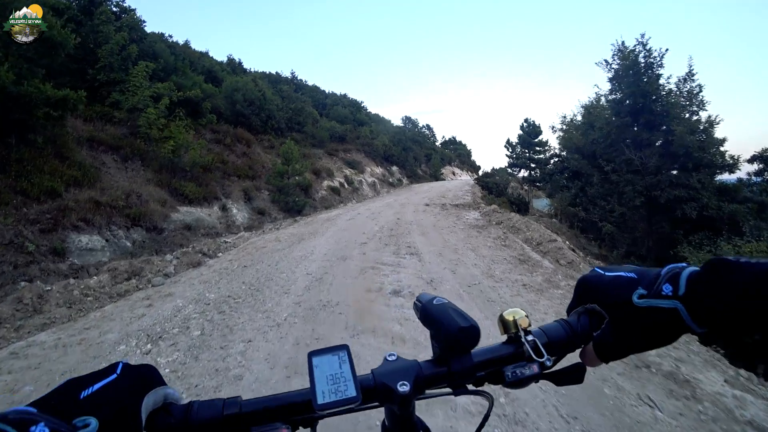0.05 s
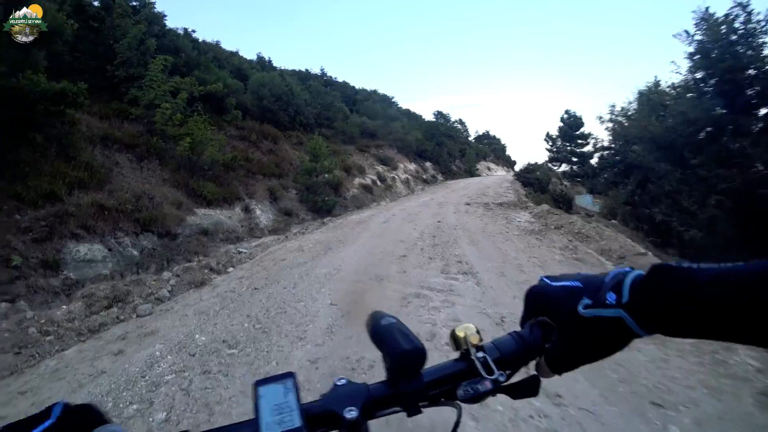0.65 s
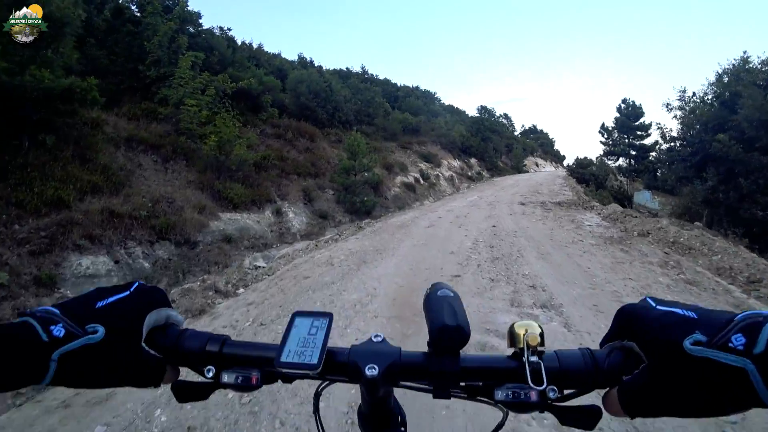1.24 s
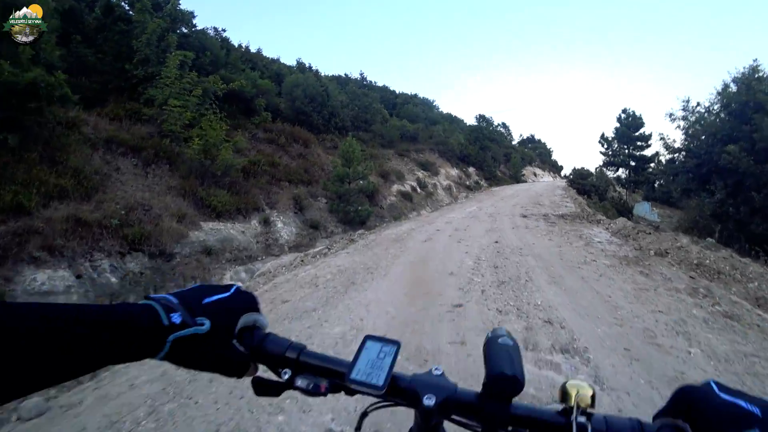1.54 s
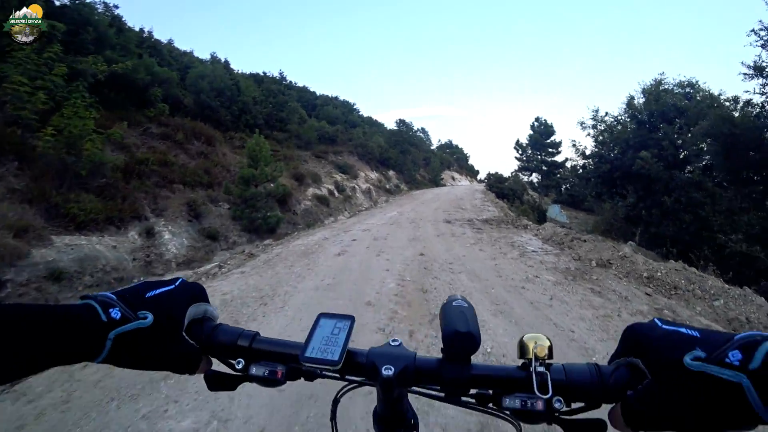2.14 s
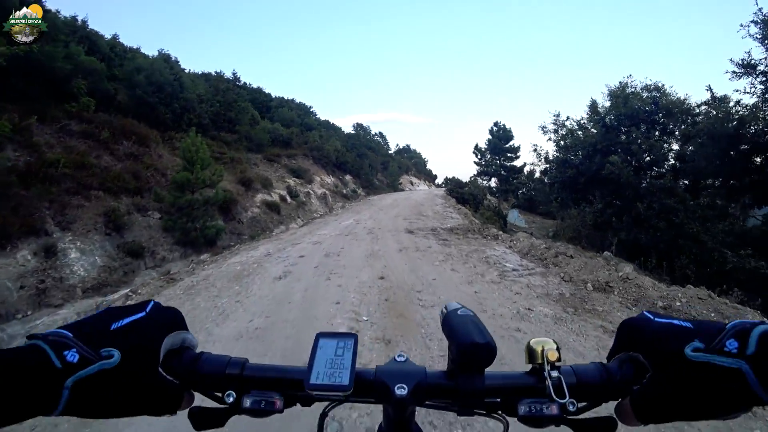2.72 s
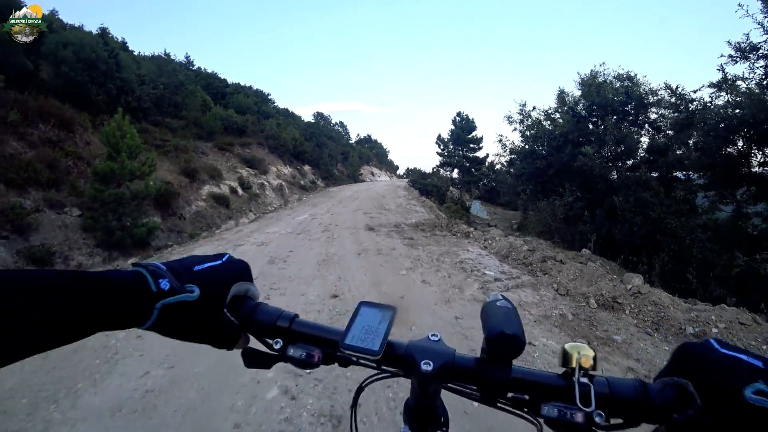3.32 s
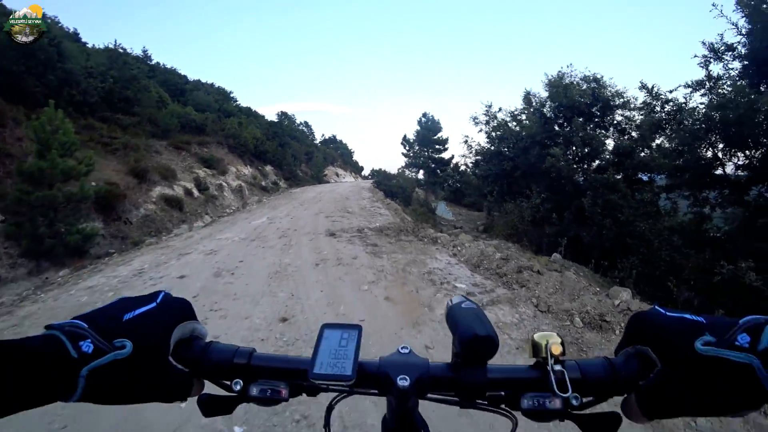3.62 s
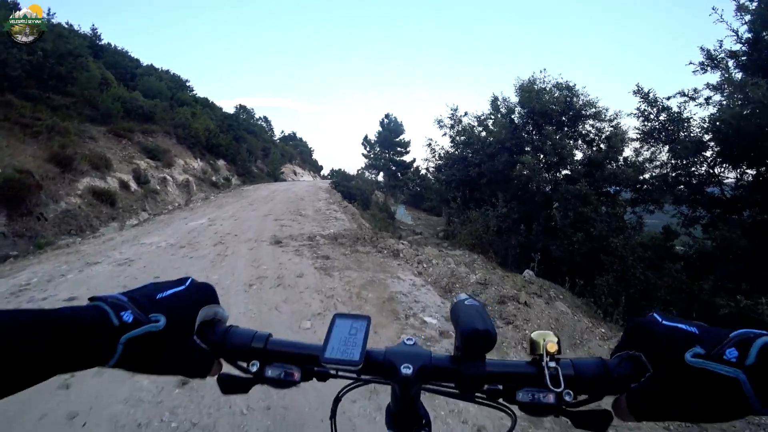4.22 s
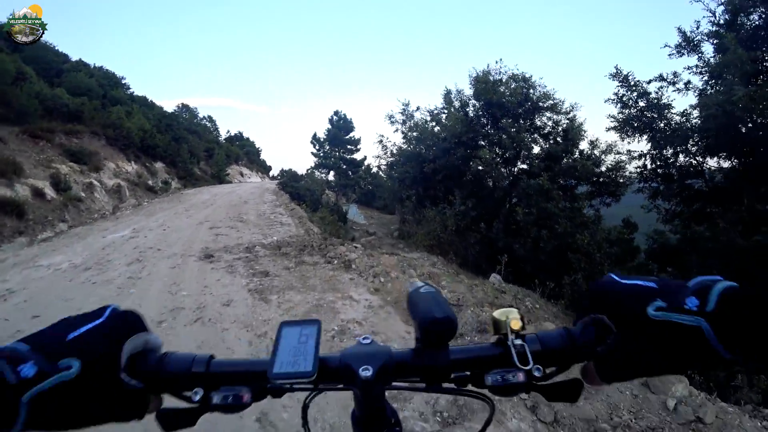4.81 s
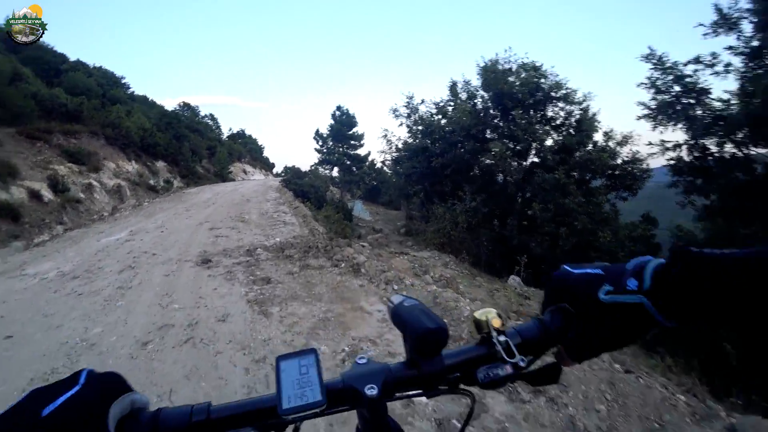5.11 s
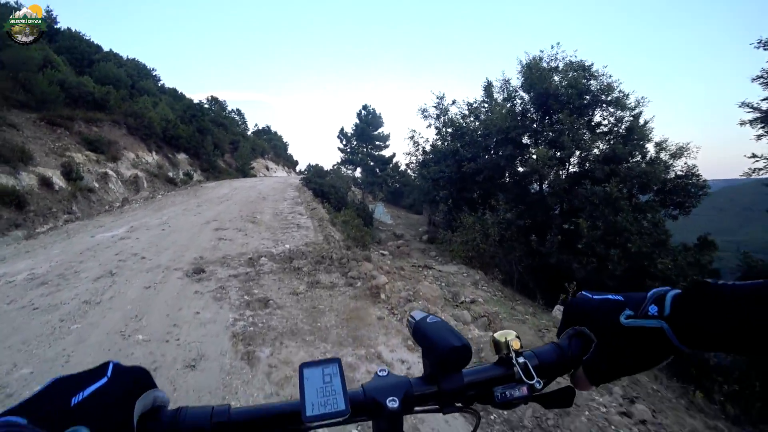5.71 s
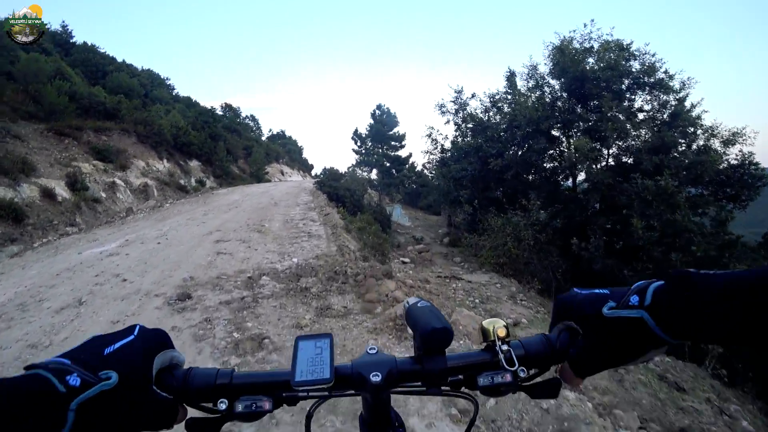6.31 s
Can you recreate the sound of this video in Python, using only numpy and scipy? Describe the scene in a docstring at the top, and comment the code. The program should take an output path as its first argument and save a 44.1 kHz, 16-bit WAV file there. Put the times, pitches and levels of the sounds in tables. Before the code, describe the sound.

Close, dense crackle of bicycle tyres rolling on a loose gravel track, dotted with sharp stone pops and a soft buffet of air.

```python
"""Mountain bike tyres crush dry gravel, heard from a camera on the rider's chest.
Grit crunches in dense little bursts, larger stones pop from under the tread and bumps knock the frame.
Dust crackles, chips clink, dragged stones scrape and a few pinched ones squeak.
Air buffets the microphone softly; the camera adds a faint hiss and whine."""
import sys
import numpy as np
from scipy import signal
from scipy.fft import rfft, irfft, next_fast_len
from scipy.io import wavfile
from scipy.ndimage import uniform_filter1d

SR = 44100
rng = np.random.default_rng(int(sys.argv[2]) if len(sys.argv) > 2 else 0)


def digitize_waveform(pressure):
    """Quantize a signal to 16-bit integers and store it at the path in sys.argv[1].

    Rows of a 2-D input are taken as channels; values are limited to [-1, 1].
    """
    field = np.atleast_2d(pressure).T
    bounded = np.clip(field, -1, 1)
    quanta = np.round(bounded * 32767).astype(np.int16)
    wavfile.write(sys.argv[1], SR, quanta)


N = 280211
TIME = np.arange(N) / SR
LEAD_S = .004  # grinding before a stone cracks

# rolling bed: t/s, crunch/dB, drumming/dB, sand/dB
ROLLING = [(0.0, -60.5, -64.5, -57.5), (0.34, -47.5, -54, -47), (0.9, -49, -51.5, -48),
           (1.57, -49, -53.5, -44.5), (1.82, -50, -57, -48), (2.37, -50, -52.5, -48),
           (2.83, -46, -51, -47.5), (3.13, -44.5, -51.5, -48.5), (3.32, -47.5, -51.5, -46.5),
           (3.77, -46, -50.5, -49.5), (4.14, -47, -48, -46.5), (4.32, -51, -50.5, -49.5),
           (4.69, -48, -53, -49.5), (4.81, -52.5, -61, -52.5), (4.87, -50.5, -58, -49.5),
           (5.13, -50.5, -58, -50), (5.25, -54.5, -60, -51), (5.37, -57, -64, -54.5),
           (5.48, -56, -58, -54.5), (5.64, -52, -57, -53.5), (6.35, -52.5, -56, -52.5)]
def tyres(drum_gain_db=-1.26, crunch_gain_db=-4.0, sand_gain_db=-3.0, drum_follow=0.73, uneven_db=1.37):
    """Grit drums on the casing, crunches, and hisses where it is fine."""
    crunch_db, drum_db, sand_db = curves(ROLLING)
    rise_db, sand_rise_db = give_way()
    grains = grit()
    drum = unit(band(grains, 30, 1018)) * undb(drum_db + drum_gain_db + drum_follow * rise_db)
    crunch = unit(band(grains, 1050, 2950)) * undb(crunch_db + crunch_gain_db + rise_db)
    sand = unit(band(grains, 2980, 30000)) * undb(sand_db + sand_gain_db + sand_rise_db)
    return (drum + crunch + sand) * undb(uneven_db * walk(per_s=24))


# loose patches: centre t/s, length/s, crunch change/dB, sand change/dB
LOOSE_PATCHES = [(0.102, 0.17, 14, 8), (0.375, 0.037, 4, 1.5), (0.618, 0.066, 6.5, 4),
                 (0.797, 0.035, 4.5, 1.5), (1.18, 0.015, -3, 2), (1.374, 0.045, 6.5, 6), (1.5, 0.047, 3, 2),
                 (1.59, 0.082, 3, -1.5), (2.067, 0.16, 1, 2), (2.355, 0.026, 10.5, 6),
                 (2.586, 0.029, 0.5, 6), (2.76, 0.09, 2, 1), (2.981, 0.11, 5, 6.5), (3.215, 0.12, 6, 1.5),
                 (3.349, 0.064, 7.5, 1), (3.546, 0.18, 5.5, 1.5), (3.82, 0.1, 7.5, 5.5),
                 (4.42, 0.14, 11, 8), (4.73, 0.048, 1, 0), (5.506, 0.095, 5.5, 4), (5.82, 0.14, 3.5, 0),
                 (6.26, 0.03, 5, 8), (6.347, 0.011, 13.5, 3)]
def give_way():
    """Tyres sink into loose patches; returns the crunch and sand changes in dB."""
    return sum(np.outer([crunch_db, sand_db], swell(s, length_s))
               for s, length_s, crunch_db, sand_db in LOOSE_PATCHES)


def grit(per_s=4200, spread_db=3.0, bite_db=0.08, patch_db=2.0, ring_db=10, ring_width=0.071, kinds=40):
    """The tread crushes many small stones; each kind has its own pitch and lies in patches."""
    tread_db = bite_db * walk(per_s=150)
    out = np.zeros((2, N))
    for hz in np.geomspace(600, 8000, kinds):
        gap, size, polarity = rng.random((3, N // 100))
        at = (np.cumsum(exponential(gap)) * SR * kinds / per_s).astype(int)
        force = np.sign(polarity - .5) * undb(spread_db * np.minimum(exponential(size), 5.0))
        at, force = at[at < N], force[at < N]
        force = force * undb(tread_db[at] + patch_db * walk(per_s=51)[at])
        stone = clack(rattle=0.57, crack_s=0.00036, rattle_s=0.0031, apart=0.28)
        stone = stone + undb(ring_db) * ring(stone, hz, ring_width * hz)
        out += signal.oaconvolve(np.bincount(at, force, N)[None], stone, axes=-1)[:, :N]
    return through_tyre(out)


# larger stones: t/s, level/dB, ring f/Hz, thud/dB, snap/dB, splinter/dB, rattle share/0-1
STONE_POPS = [(0.0819, -8, 1790, -8, -1, -1, 0.7), (0.1025, -11, 2000, -20.5, 2, -15.0, 0.9),
              (0.1375, -7, 1940, 3, 1.5, 2, 0.9), (0.1593, 1.5, 8280.0, 1, -4.5, 4.5, 0.11),
              (0.2309, -17, 2650.0, -16.5, 2, 9, 0.4), (0.2517, -11.5, 5150.0, 8, -4, -5, 0.8),
              (0.2591, -6, 1970, 8.5, -3, -7, 0.76), (0.3123, -12.5, 13000.0, -19, 2, 4, 0.5),
              (0.3271, -3, 5300, 0, -3, -9, 0.46), (0.3682, -13, 2650.0, 4.5, 1, 4, 0.34),
              (0.3857, -14, 3520.0, -7, -5, -10.0, 0.1), (0.4051, -18, 2650.0, -8.5, 1, 3.5, 0.15),
              (0.4156, -13.5, 2650.0, -30, 2, -8.0, 0.12), (0.4739, -10.5, 1800, 0, -3, 0, 0.5),
              (0.4764, -10, 1800, -1, -3, 0, 0.06), (0.4877, -10.5, 9700, -18, 3, 8.5, 0.5),
              (0.5026, -16, 2910.0, -14.5, 2, -11.5, 0.9), (0.5305, -22, 2650.0, 5, 7, -6, 0),
              (0.634, -18, 4680, -8, 3, -5, 0.3), (0.6393, 0.5, 2170, 1, -10, -17, 0),
              (0.642, -5.5, 1500, -2, -13, -8, 0.8), (0.646, -6.5, 2400, -8, -7, -10, 0.2),
              (0.707, -24, 6200, -10, -2, 13, 0.4), (0.7784, -9, 4680.0, 2, -5.5, -1, 0.9),
              (0.94, -18.5, 4680.0, -10, 7.5, 1, 0.6), (1.018, -17.5, 1670, 1, -7, 0, 0.9),
              (1.21, -11.5, 3950, -4, -11, -25, 0.2), (1.369, -18, 1600, -11, 4, 6, 0.94),
              (1.5008, -10.5, 5270, 2, -2.5, -2, 0.55), (1.5266, -22, 6230.0, 0, 9.5, -4.0, 0.7),
              (1.5665, -19, 3520.0, -7.5, 5, -10, 0.8), (1.6348, -17, 7530.0, 10, -5, -5.0, 0.7),
              (1.722, -7.5, 2320, -2, 0.5, -9, 0.57), (1.8123, -11, 3540.0, -22, 1, -10.0, 0.16),
              (1.8235, -22.5, 2910.0, 2, 12, -3, 0.3), (1.9781, -13.5, 2400, 11, -11, -11, 0.3),
              (2.0283, -17, 2410.0, -15.5, 2, -7, 0.4), (2.0396, -21, 3200.0, -4, 2, -4, 0.64),
              (2.0583, -18, 3200.0, -11, 1, -12.5, 0.5), (2.1101, -10, 3520.0, -10.5, -4, -14.5, 0.5),
              (2.1262, -17, 7450, -12.0, 9.5, 12, 0.02), (2.2549, -21, 3200.0, -1, -17, -13, 0.12),
              (2.298, -27, 6200, -5, 6, 11, 0.3), (2.3581, -17, 4260.0, 3, 0, 8.0, 0.8),
              (2.399, -17, 5200, 11.5, -1, 2, 0.6), (2.4673, -18, 6230.0, -1, -3, 7, 0.1),
              (2.5017, -10, 7340, 4, 2, 3, 0.3), (2.592, -15, 2400, -5, -1, 5, 0.5),
              (2.6436, -10.5, 2410.0, 0, 1.5, -10.5, 0.7), (2.7225, -15, 2400.0, 2, 3, 8, 0.6),
              (2.7354, -13, 2910.0, -2, -1.5, -1, 0.3), (2.7575, -25, 9000.0, 0.0, 4.0, 12.0, 0.8),
              (2.775, -17.5, 2000.0, 6, 2, -1, 0.3), (2.7913, -7.5, 1640, -21, -4, -13.5, 0),
              (2.8241, -13, 9100.0, -23.5, -12, -14, 1.0), (2.8407, -7, 3870.0, -12, -10.5, -16, 0.25),
              (2.8497, -12.5, 1650.0, -20.0, -8, -23.0, 0.05), (2.867, -14, 2300.0, -5, -7, 0.0, 0.1),
              (2.8825, -20, 7000.0, -1, 5, 14, 0.7), (2.9849, -8, 2000, -15, -5, -3, 0.9),
              (3.0322, -13.5, 3180, -8, 6.5, 22.5, 0.1), (3.0899, -12, 1810.0, 6, -5, -12.5, 0.3),
              (3.1615, -24.5, 5150.0, 9, 7, 0.5, 0.4), (3.2009, -20, 4680.0, -4.0, 2, 11, 0.8),
              (3.2114, -13.5, 4260.0, -4, -2, 7, 0), (3.2461, -26, 3520.0, 3.5, 8, -14.5, 0.03),
              (3.2737, -13.5, 1500.0, 11.5, 2, -9.0, 0.97), (3.3212, -15, 2410.0, -1, 1, -8.5, 0.57),
              (3.389, -28, 7500, -5, 4, 12, 0.3), (3.5321, -9, 3520.0, -9, -6, -7, 0.8),
              (3.6012, -4.5, 1450, 9, -7.0, -24, 0.9), (3.664, -12, 2650, -3, -6, -8, 0.7),
              (3.7343, -15.5, 1650.0, -1, -6, -8, 0.4), (3.778, -15, 2900, -2, -2, 6, 0.3),
              (3.7814, 0, 3250, -16, -24, -13, 0.6), (3.7871, -4, 1770, 2, -10, -15.0, 0.5),
              (3.8486, -3.5, 8340, -4, -1, -5, 0.13), (3.8746, -12, 4680.0, -13, -2, 9, 0.9),
              (3.899, -23.5, 6230.0, -9.0, 6, 4, 0.1), (3.948, -20, 2000.0, 4, -4, -3.0, 0.2),
              (3.9665, -15.5, 2910.0, -13.0, -3, 6, 0.13), (4.009, -24, 1700.0, 3, -3.0, -5.0, 0.3),
              (4.02, -20, 5200, -5, 5.5, 15, 1), (4.093, -2.5, 2410.0, -4, -2, -9.0, 0.7),
              (4.1014, -22, 3520.0, 12, 10, 3, 0.03), (4.1967, -21, 4260.0, -10.0, 6, -12.0, 0.3),
              (4.2101, -11, 3520.0, -10, -22.5, -15.0, 0.4), (4.2294, -23, 3870.0, -23, 7, -1.5, 0.2),
              (4.2516, -17, 2410.0, 15, 11.5, 0, 0.5), (4.2895, -10, 4680.0, -12, -7, -7.5, 0.8),
              (4.2958, -14, 1990.0, -20, 2, -9.0, 0.34), (4.3762, -5, 3870.0, 3, -11, -11, 0.7),
              (4.3885, -16, 2600, 0, -7, -6, 0.6), (4.3973, -19.5, 13000.0, 12, 13, 17, 0.5),
              (4.437, -15, 3300, 2, -1, -4, 0.5), (4.488, -19, 1300, 16, -9, -8, 0.5),
              (4.503, -14, 1150, 8, -6, -8, 0.5), (4.556, -18, 13000.0, -8.0, 5, 9, 0.9),
              (4.5668, -19.5, 8280.0, -14.0, 6, 21, 0.4), (4.731, -15.5, 1850, -9, -6, 1, 0.8),
              (4.9205, -31, 3200.0, 12, 15, 7, 0.21), (5.003, -18, 3200, 0, -3, 1, 0.6),
              (5.1676, -21, 2910.0, 8, 9.5, -10, 0.41), (5.191, -20, 2100.0, 9, -5, -8, 0.9),
              (5.2199, -13, 3200.0, -12, 5.5, 0.0, 0.9), (5.2298, -18, 2910.0, 8.5, 8.5, 7, 0.4),
              (5.2341, -18, 2420, -7, 1, -10.0, 0.4), (5.53, -19.5, 2650, 7, 2, -8, 0.5),
              (5.5445, -13.5, 2650.0, 1, -1, -16, 0.6), (5.558, -24, 1800, 14, -3, -5, 0.4),
              (5.673, -29, 4260, -4, 4, 8, 0.2), (5.695, -28, 3500, -6, -2, 2, 0.4),
              (5.9591, -19.5, 3520.0, 2, 1, 8, 0.3), (5.977, -21, 4700, -3, -1, 9, 0.5),
              (5.996, -16.5, 2440, 5, -7, -4, 0.8), (6.081, -22, 2600, 3, -9, -3, 0.3),
              (6.2081, -11, 4260.0, 3, -8, -7.5, 0.45), (6.261, -17, 5200, 2, -10, 7, 0.7),
              (6.2717, -16, 1810.0, -25, -9, 4, 0), (6.344, -21, 5200, 5, 1, 12, 0.7)]
def stones(gain_db=0.35, ring_db=2, ring_width=0.2, clean_s=0.0026, crumble_s=0.0048):
    """Stones shoot out and ring briefly: heavy ones thud on the tyre, brittle ones snap and splinter."""
    out = np.zeros((2, N))
    for s, db, hz, thud_db, snap_db, splinter_db, rattle in list(STONE_POPS) + pebbles():
        rattle_s = clean_s + crumble_s * rattle
        hit = clack(rattle, crack_s=.0005, rattle_s=rattle_s, apart=0.4, rise_s=0.00056)
        hit = hit + undb(ring_db) * ring(hit, hz, ring_width * hz)
        tone = [(150, thud_db - 10), (320, thud_db), (700, thud_db), (1200, 0), (2800, 0),
                (4400, snap_db), (7000, snap_db), (10500, splinter_db), (12500, splinter_db - 8)]
        add(out, s - LEAD_S, undb(db + gain_db) * colour(hit, tone))
    return through_tyre(out)


def pebbles(over_db=19.0, spread_db=2, centre_hz=4000, spread_oct=0.27, max_rattle=0.75, count=60):
    """Smaller stones tick at random, following the crunch level; rows as in STONE_POPS."""
    when, rattle = rng.random((count, 2)).T
    size, pitch, heavy, brittle = np.clip(rng.standard_normal((count, 4)).T, -2, 2)
    s = when * N / SR
    db = np.interp(s, TIME, curves(ROLLING)[0]) + over_db + spread_db * size
    hz = centre_hz * 2 ** (spread_oct * pitch)
    thud_db, snap_db, splinter_db = -9 + 4 * heavy, 2 + 2 * brittle, -2 + 4 * brittle
    return list(zip(s, db, hz, thud_db, snap_db, splinter_db, max_rattle * rattle))


def clack(rattle, crack_s, rattle_s, apart, rise_s=0.00059, size=2048):
    """One stone grinds, cracks, then rattles differently to each side; white, energy 1 per side."""
    t = np.arange(size) / SR - LEAD_S
    crack, shared, left, right = rng.standard_normal((4, size))
    crack = unit(crack * (t >= 0) * np.exp(-np.abs(t) / crack_s))
    tail = np.sqrt(1 - apart) * shared + np.sqrt(apart) * np.array([left, right])
    tail = unit(tail * np.exp(np.minimum(t / rise_s, -t / rattle_s)))
    hit = np.sqrt(1 - rattle) * crack + np.sqrt(rattle) * tail
    power = uniform_filter1d(np.mean(np.abs(rfft(hit)) ** 2, axis=0), size=41)
    whitening = np.column_stack([np.fft.rfftfreq(size, 1 / SR), -10 * np.log10(power)])[1:]
    return unit(colour(hit, whitening)) / np.sqrt(size)


# tyre and wheel modes: f/Hz, width/Hz, gain/dB
TYRE_MODES = [(332, 61, -4.5), (473, 28, -7.5), (712, 26, -23), (900, 41, -21), (1600, 470, -0.5)]
# crushed gravel spectrum: f/Hz, gain/dB
GRAVEL_SPECTRUM = [(60, -41), (110, -25), (180, -11), (300, -4), (480, 1), (850, -1), (1120, -3.5),
                   (1600, -0.5), (2500, 3), (3500, 0.5), (6300, -1.5), (8000, -8.5), (9300, -16.5),
                   (15500, -17)]
def through_tyre(blows):
    """Blows on the ground reach the air through the tyre and its modes."""
    ringing = sum(undb(db) * ring(blows, hz, width_hz) for hz, width_hz, db in TYRE_MODES)
    return colour(blows + ringing, GRAVEL_SPECTRUM)


# bumps: t/s, lower f/Hz, lower level/dB, upper f/Hz, upper level/dB
BUMPS = [(0.2579, 348, -32.5, 720, -30.5), (0.639, 250, -51, 726, -33), (1.978, 385, -51, 735, -49),
         (2.72, 292, -36, 630, -44), (2.774, 470, -38, 730, -52), (3.602, 575, -42, 950, -25.5),
         (3.66, 470, -45, 630, -40), (3.849, 288, -28.5, 470, -36.5), (4.092, 430, -31, 816, -30),
         (4.331, 247, -38.5, 550, -31.5), (4.366, 220, -41, 630, -32), (4.375, 730, -40, 900, -26),
         (4.412, 264, -28, 468, -44), (4.482, 517, -35.5, 730, -39)]
# frame modes: f/Hz, decay/s
FRAME_MODES = [(215, 0.0045), (330, 0.0092), (475, 0.0084), (630, 0.0035), (735, 0.0079), (835, 0.002),
               (925, 0.0042)]
def knocks(gain_db=1.5, push_s=0.00053, width_oct=0.2, detune=0.0082):
    """A bump rings the hollow frame; where it lands picks a lower and an upper group of modes."""
    out = np.zeros((2, N))
    t = TIME[:SR // 10]
    attack = 1 - np.exp(-t / push_s)
    for s, low_hz, low_db, high_hz, high_db in BUMPS:
        ringing = 0
        for k, (hz, decay_s) in enumerate(FRAME_MODES):
            weight = sum(undb(db) * np.exp(-(np.log2(hz / group_hz) / width_oct) ** 2 / 2)
                         for group_hz, db in [(low_hz, low_db), (high_hz, high_db)])
            phase = 2 * np.pi * hz * (1 + detune * rng.standard_normal()) * t
            ringing += (-1) ** k * weight * np.sin(phase) * np.exp(-t / decay_s)
        add(out, s, undb(gain_db) * attack * ringing)
    return colour(out, [(80, -35), (170, 0.5), (280, -1.5)])  # thin tubes radiate no deep bass


def dust(per_s=450, spread_db=3.0, level_db=-61.0, sand_follow=0.89, patch_db=4.0):
    """The finest grains crackle high above the crunch, louder where the tyres bite harder."""
    chance, size = rng.random((2, N))
    ticks = (chance < per_s / SR) * undb(spread_db * np.minimum(exponential(size), 4.0))
    speck = clack(rattle=0.83, crack_s=0.0011, rattle_s=0.00081, apart=0.055, rise_s=0.00024)
    speck = colour(speck, [(1000, -47), (4000, 20.5), (7500, -2), (10500, 9.5), (12500, 1.5), (15500, 1)])
    load = undb(sand_follow * curves(ROLLING)[2] + give_way()[1] + patch_db * walk(per_s=5.9))
    crackle = signal.oaconvolve((ticks * load)[None], speck, axes=-1)[:, :N]
    return undb(level_db) * unit(crackle)


def clinks(over_db=9, spread_db=2, centre_hz=2300, spread_oct=0.408, decay_s=0.0022, push_s=0.00053,
           count=170):
    """Flat chips of stone tip over and clink, each on its own pitch."""
    out = np.zeros((2, N))
    t = TIME[:SR // 30]
    crunch_db = curves(ROLLING)[0]
    envelope = np.exp(-t / decay_s) * (1 - np.exp(-t / push_s))
    for when, (size, pitch) in zip(rng.random(count), np.clip(rng.standard_normal((count, 2)), -2, 2)):
        hz = centre_hz * 2 ** (spread_oct * pitch)
        db = crunch_db[int(when * N)] + over_db + spread_db * size
        add(out, when * N / SR, undb(db) * envelope * np.sin(2 * np.pi * hz * t))
    return out


# dragged stones: t/s, length/s, ring f/Hz, level/dB
DRAGS = [(0.969, 0.02, 710, -47.5), (1.349, 0.031, 1570, -45.5), (2.753, 0.11, 1850, -49),
         (2.963, 0.036, 1740, -45.5), (3.165, 0.048, 1670, -46.5), (3.241, 0.055, 1550, -47),
         (3.332, 0.034, 1900, -56), (4.124, 0.083, 2460, -48.5), (4.217, 0.042, 2380, -46),
         (4.375, 0.023, 2650, -44.5), (4.478, 0.025, 1140, -46), (5.407, 0.046, 2630, -54),
         (5.51, 0.04, 2700, -62), (6.14, .04, 2680, -56), (6.253, 0.033, 2440, -57)]
def scrapes(slips_per_s=900, base_width_hz=220, width_share=0.23, gain_db=1):
    """A stone dragged under the tread sticks and slips; each slip rings it."""
    out = np.zeros((2, N))
    t = TIME[:SR // 8]
    for s, length_s, hz, db in DRAGS:
        chance, force = rng.random(len(t)), rng.standard_normal(len(t))
        envelope = np.sin(np.pi * np.minimum(t / length_s, 1))
        slips = force * (chance < slips_per_s / SR) * envelope
        width_hz = base_width_hz + width_share * hz
        ringing = unit(ring(ring(slips, hz, width_hz), hz, width_hz))
        add(out, s, undb(db + gain_db) * ringing * np.sqrt(length_s * SR / len(t)))
    return out


# pinched stones: t/s, f/Hz, length/s, fundamental/dB, octave/dB
PINCHES = [(1.166, 2850, .019, -39, -46), (1.177, 2250, .012, -47, -38.5), (1.187, 2200, .012, -47, -39.5),
           (5.061, 2230, .022, -62, -47.5), (5.101, 2200, .013, -62, -48.5)]
def squeaks(sag=0.06, waver=0.026, rough=0.45):
    """Rubber slips on a stone: a very short, rough tone that sags as the grip lets go."""
    out = np.zeros((2, N))
    unsteady = 1 + waver * walk(per_s=940)
    grip = 1 + rough * walk(per_s=1800)
    for s, hz, length_s, first_db, octave_db in PINCHES:
        progress = np.linspace(0, 1, int(length_s * SR))
        span = int(s * SR) + np.arange(len(progress))
        pitch_hz = hz * (1 - sag * (progress - .5)) * unsteady[span]
        phase = 2 * np.pi * np.cumsum(pitch_hz) / SR
        tone = undb(first_db) * np.sin(phase) + undb(octave_db) * np.sin(2 * phase)
        add(out, s, grip[span] * np.sin(np.pi * progress) * tone)
    return out


# air puffs: centre t/s, length/s, level/dB
AIR_PUFFS = [(0.136, 0.077, -54.5), (0.393, 0.28, -60), (0.645, 0.05, -55), (0.765, 0.1, -63),
             (1.53, 0.078, -64), (1.802, 0.079, -60.5), (2.312, 0.062, -65), (2.763, .05, -77),
             (2.985, 0.036, -65), (3.16, 0.038, -64), (3.447, 0.15, -70), (4.385, 0.081, -73),
             (4.602, 0.09, -71), (5.646, 0.13, -72.5)]
# buffeting spectrum: f/Hz, gain/dB
AIR_SPECTRUM = [(20, -15), (55, -4), (95, 1), (150, 0.5), (260, -7.5), (900, -102)]
def air(wind_db=-84.5, sand_follow=1.6, flutter_db=3, puff_gain_db=-3):
    """A fluttering head wind and single puffs buffet the two microphone ports, partly differently."""
    noise = rng.standard_normal(N) + rng.standard_normal((2, N))
    sand_db = curves(ROLLING)[2]
    wind = undb(wind_db + sand_follow * (sand_db - sand_db.mean()) + flutter_db * walk(per_s=7.2))
    puffs = sum(undb(db + puff_gain_db) * swell(s, length_s) for s, length_s, db in AIR_PUFFS)
    return unit(colour(noise, AIR_SPECTRUM, size=4096)) * (wind + puffs)


# hiss spectrum: f/Hz, gain/dB
HISS_SPECTRUM = [(100, -1), (1000, 22.5), (6000, 8.5), (10500, 5), (13000, -0.5), (16000, -7)]
# whines: f/Hz, left level/dB
WHINE_TONES = [(9890, -72), (9950, -73)]
def camera_noise(hiss_db=-56.0, right_db=-11, wander_hz=4, jitter_hz=14):
    """The electronics add steady hiss and a close pair of thin whines, the whines mostly on the left."""
    hiss = unit(colour(rng.standard_normal((2, N)), HISS_SPECTRUM))
    drift_hz = wander_hz * walk(per_s=10) + jitter_hz * walk(per_s=940)
    whine = sum(undb(db) * unit(np.sin(2 * np.pi * np.cumsum(hz + drift_hz) / SR))
                for hz, db in WHINE_TONES)
    return undb(hiss_db) * hiss + np.array([whine, undb(right_db) * whine])


# camera body shading: f/Hz, left minus right/dB
BODY_SHADE = [(100, 1), (400, -1.5), (1300, -4), (2400, -4), (7000, -5), (11000, -1)]
def ports(sound, shared_hz=420):
    """Long waves reach both ports nearly alike; the body shades the left one from short waves."""
    left, right = sound
    bass_side = band((left - right)[None] / 2, 1, shared_hz, order=1)
    left = colour(left - bass_side, [(hz, db / 2) for hz, db in BODY_SHADE])
    right = colour(right + bass_side, [(hz, -db / 2) for hz, db in BODY_SHADE])
    return np.vstack([left, right])


def undb(db):
    """Decibels to gain."""
    return 10 ** (np.asarray(db) / 20)


def unit(x):
    """Scale to rms 1."""
    return x / np.sqrt(np.mean(x ** 2))


def exponential(uniform):
    """Uniform draws to exponential ones, mean 1."""
    return -np.log(1 - uniform)


def curves(table):
    """Table columns, interpolated linearly in time."""
    s, *columns = np.transpose(table)
    return [np.interp(TIME, s, column) for column in columns]


def swell(s, length_s):
    """Raised cosine around time s, above half height for length_s."""
    return .5 + .5 * np.cos(np.pi * np.clip((TIME - s) / length_s, -1, 1))


def walk(per_s):
    """Random curve, rms 1, with per_s new values a second."""
    steps = rng.standard_normal(N // 10)
    return unit(np.interp(TIME * per_s, np.arange(len(steps)), steps))


def ring(x, hz, width_hz):
    """Resonance with gain 1 at its centre."""
    return signal.lfilter(*signal.iirpeak(hz, hz / width_hz, fs=SR), x)


def band(x, lo_hz, hi_hz, order=3):
    """Zero-phase band-pass."""
    size = next_fast_len(N)
    hz = np.maximum(np.fft.rfftfreq(size, 1 / SR), 1)
    gain = 1 / (1 + (lo_hz / hz) ** (2 * order)) / (1 + (hz / hi_hz) ** (2 * order))
    return irfft(rfft(x, size) * gain, size)[:, :N]


def colour(x, points, size=1024):
    """Minimum-phase filter through (f/Hz, gain/dB) points."""
    hz, db = np.transpose(points)
    grid_hz = np.maximum(np.fft.rfftfreq(size, 1 / SR), 1)
    gain = undb(np.interp(np.log(grid_hz), np.log(hz), db))
    cepstrum = irfft(np.log(gain))
    cepstrum[1:size // 2] *= 2
    cepstrum[size // 2 + 1:] = 0
    response = irfft(np.exp(rfft(cepstrum)))
    return signal.oaconvolve(x, response[None], axes=-1)[:, :x.shape[1]]


def add(out, s, sound):
    """Mix in a short mono or stereo sound at time s."""
    start = int(np.clip(s * SR, 0, N - 1))
    out[:, start:start + sound.shape[-1]] += sound[..., :N - start]


def scene():
    """Bike and gravel at the two ports, plus air and camera noise."""
    bike = tyres() + stones() + knocks() + dust() + clinks() + scrapes() + squeaks()
    return ports(bike) + air() + camera_noise()


def record(dry, top_hz=15900):
    """The camera cuts the top with a steep low-pass."""
    return signal.sosfilt(signal.ellip(10, .2, 70, top_hz, fs=SR, output="sos"), dry)


dry = scene()
out = record(dry)
digitize_waveform(out)
```